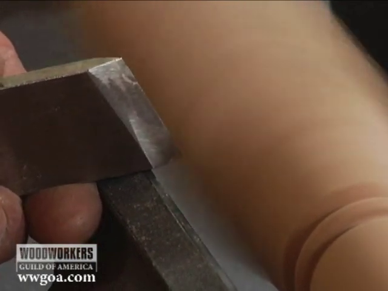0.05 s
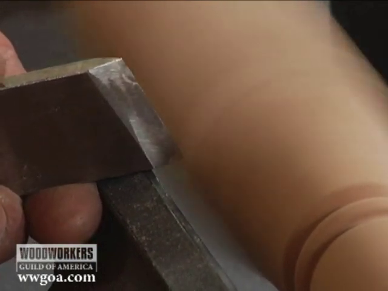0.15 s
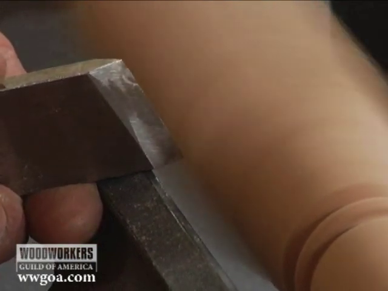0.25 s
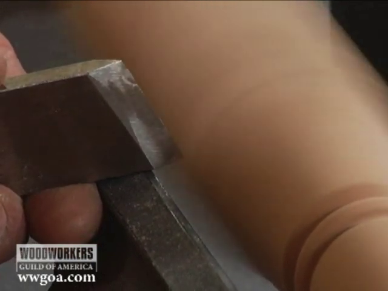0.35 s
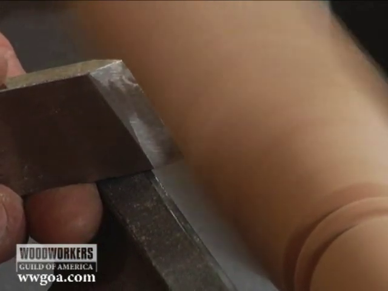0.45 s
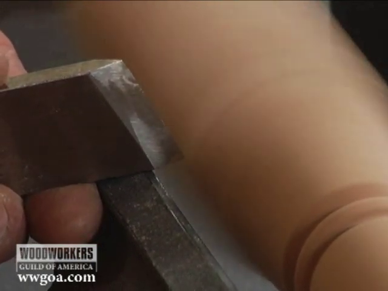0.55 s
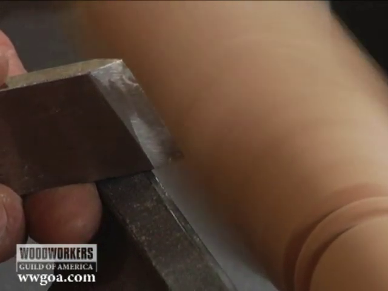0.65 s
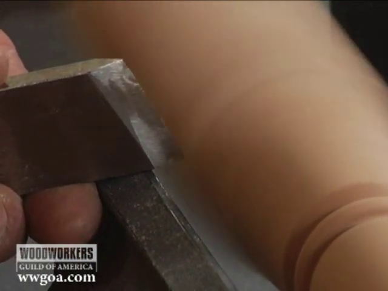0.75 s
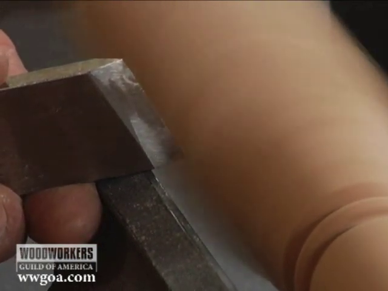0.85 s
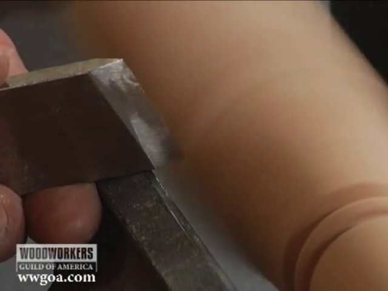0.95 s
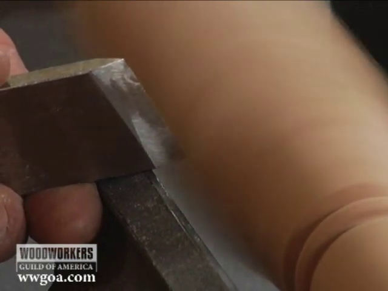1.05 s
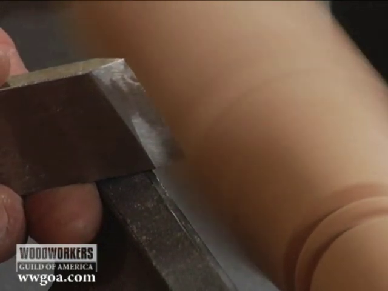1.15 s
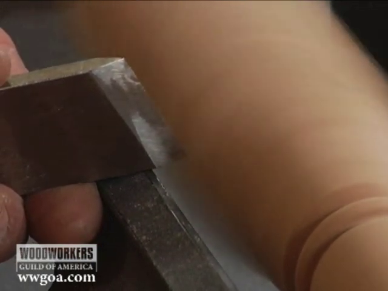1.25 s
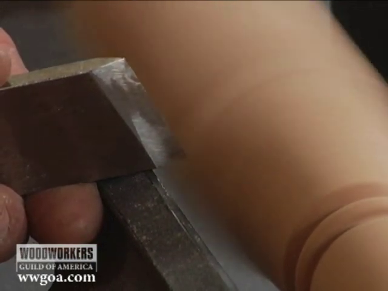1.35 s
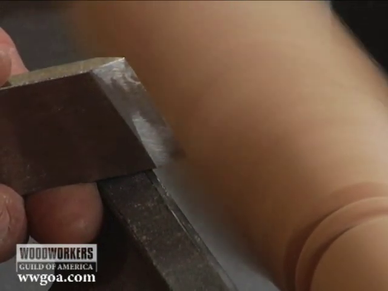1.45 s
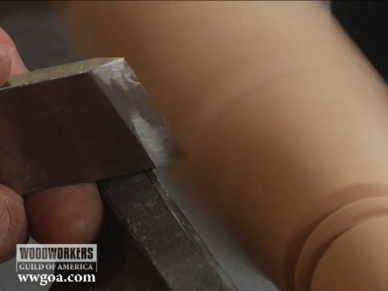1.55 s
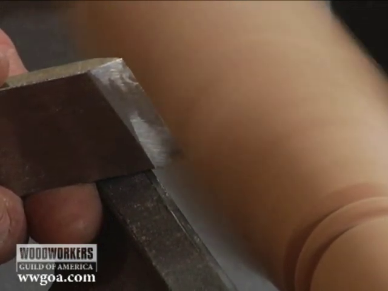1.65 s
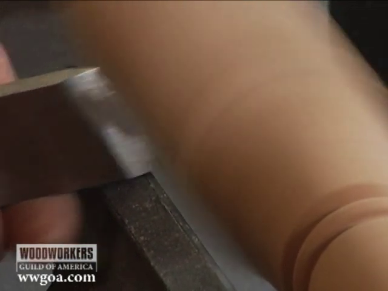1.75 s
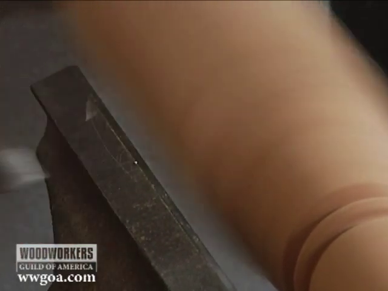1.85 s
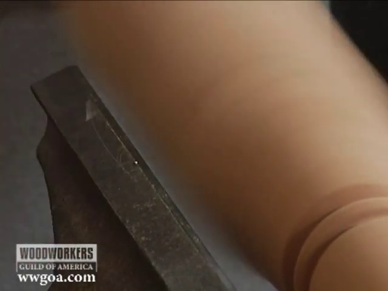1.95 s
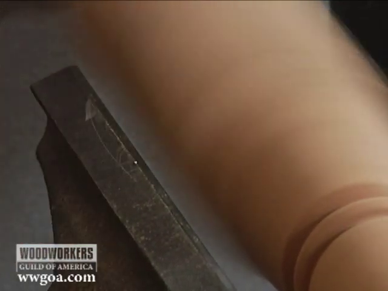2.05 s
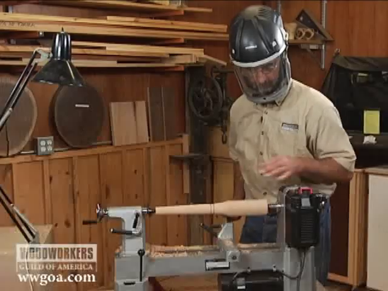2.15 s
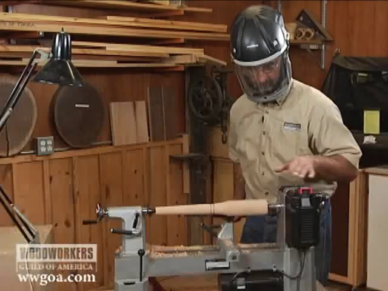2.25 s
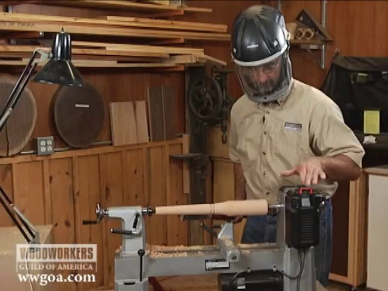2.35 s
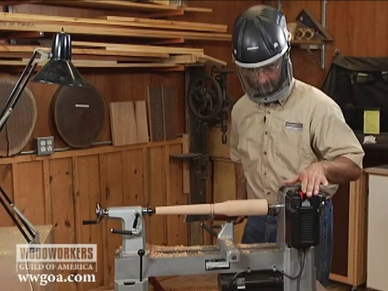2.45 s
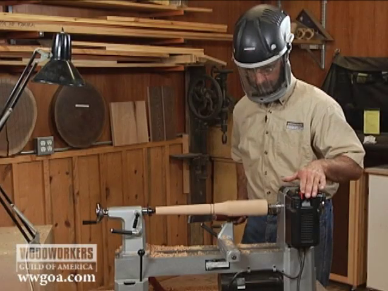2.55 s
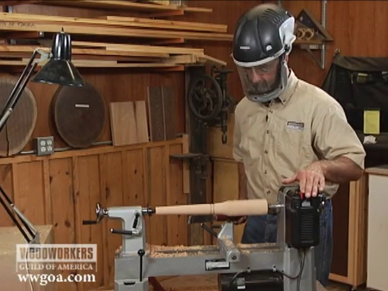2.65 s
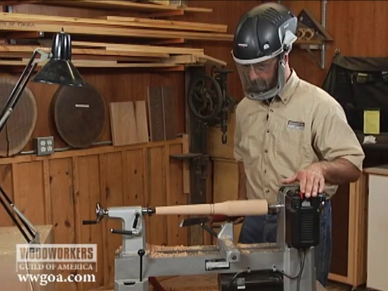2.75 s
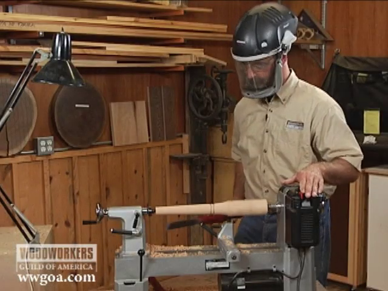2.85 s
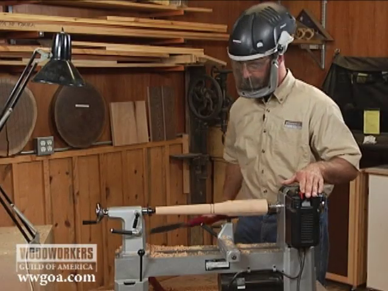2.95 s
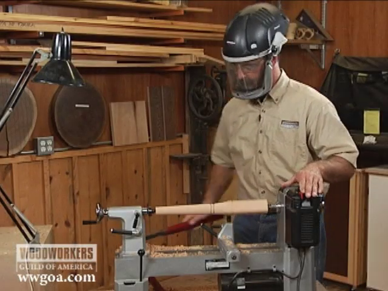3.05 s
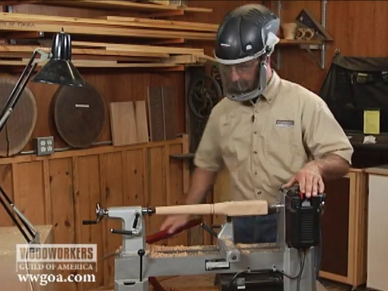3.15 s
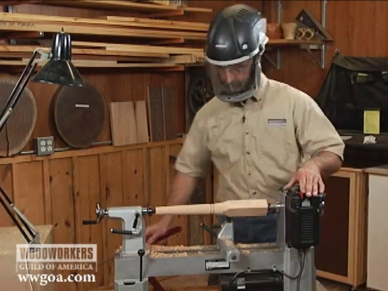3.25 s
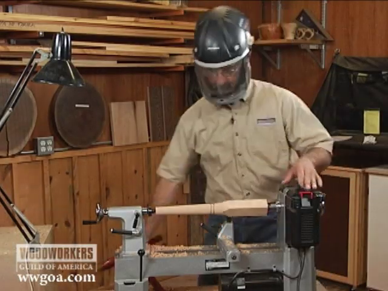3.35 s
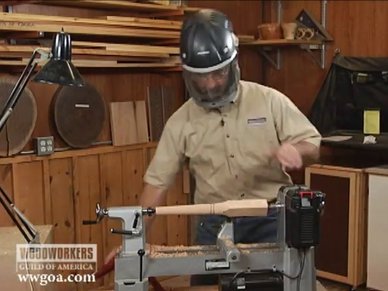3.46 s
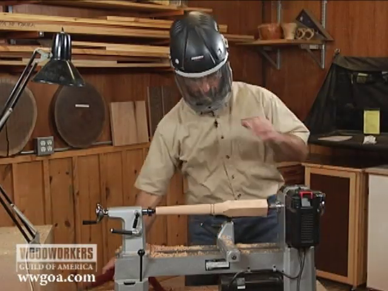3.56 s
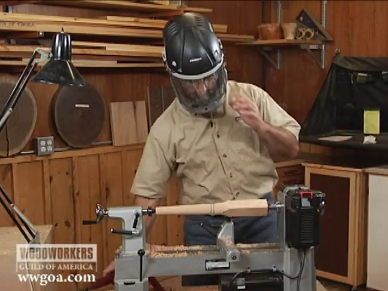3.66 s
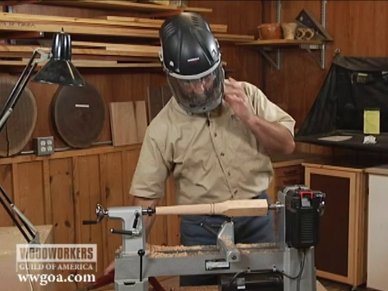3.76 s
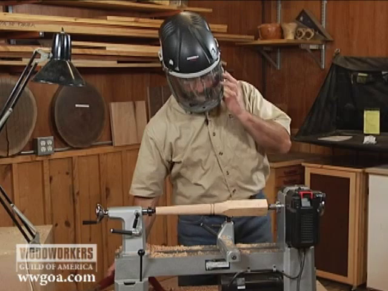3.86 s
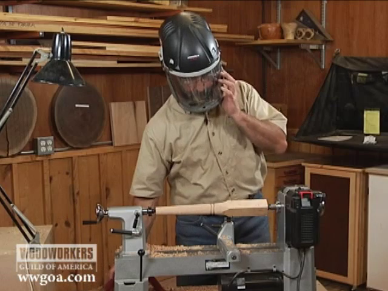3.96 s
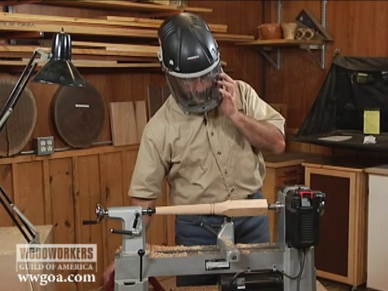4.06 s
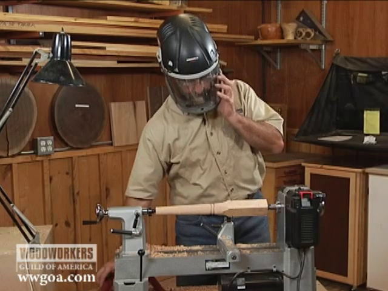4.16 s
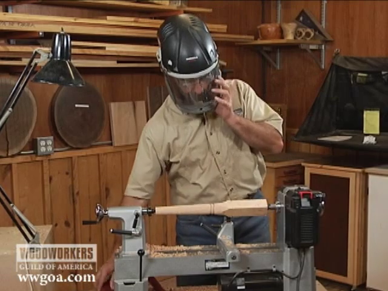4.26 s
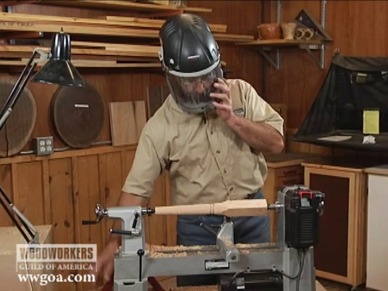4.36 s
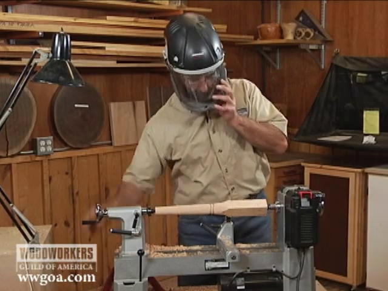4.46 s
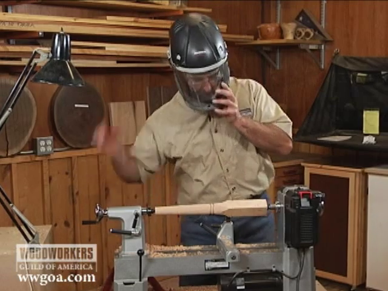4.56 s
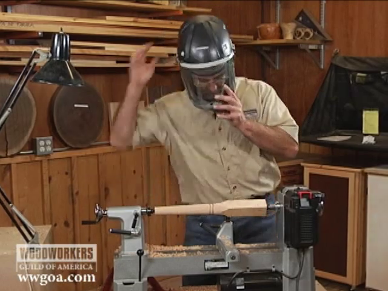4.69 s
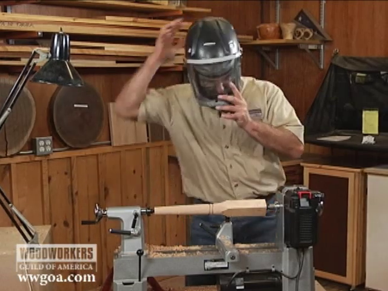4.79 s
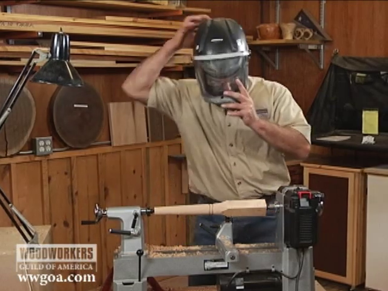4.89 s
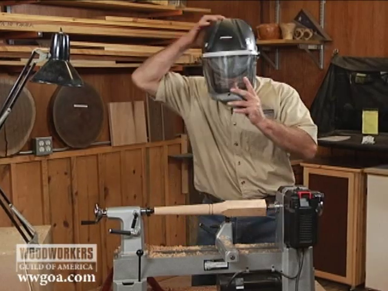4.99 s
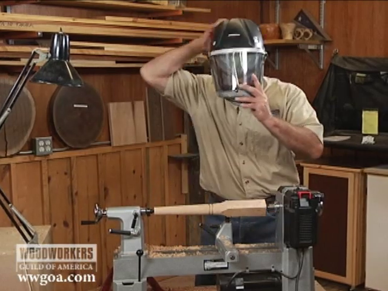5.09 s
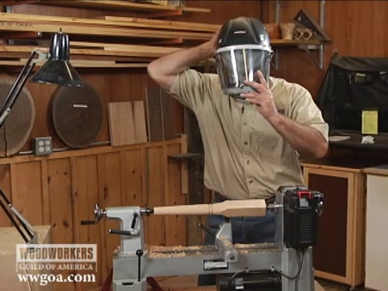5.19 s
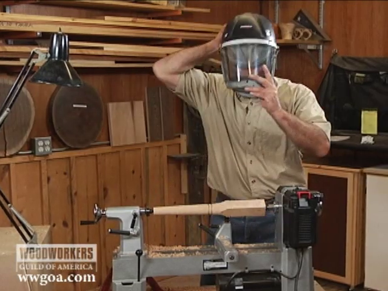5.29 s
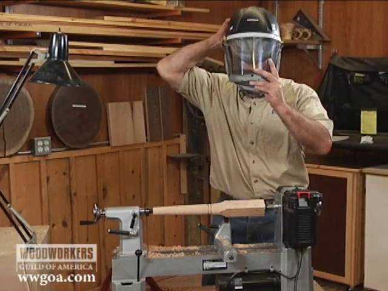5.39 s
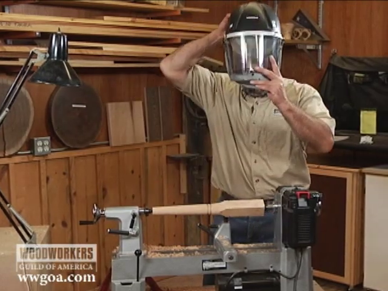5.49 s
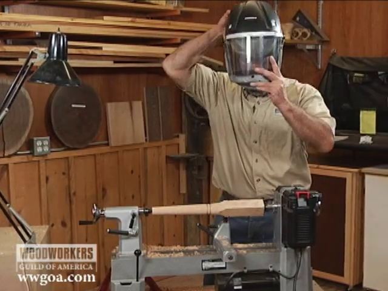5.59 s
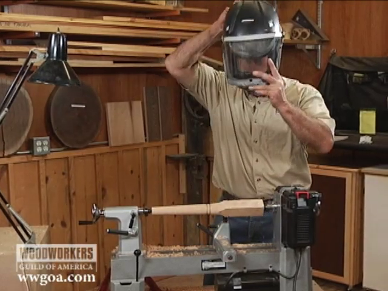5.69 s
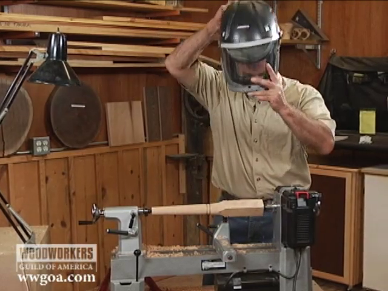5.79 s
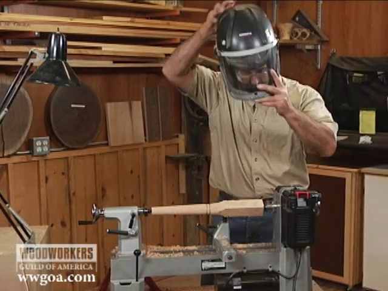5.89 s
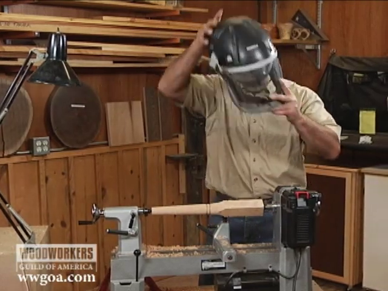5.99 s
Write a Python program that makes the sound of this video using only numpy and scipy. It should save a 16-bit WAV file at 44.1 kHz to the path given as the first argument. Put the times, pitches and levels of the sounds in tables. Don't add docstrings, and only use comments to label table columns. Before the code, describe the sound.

A chisel buzzes and rattles loudly on spinning wood, lifts off, then only a helmet blower's airy hum remains with knocks and rustling cloth.

```python
import sys
import numpy as np
from scipy import signal
from scipy.fft import rfft, irfft, next_fast_len
from scipy.io import wavfile
from scipy.ndimage import uniform_filter1d, map_coordinates

SR = 44100
rng = np.random.default_rng(int(sys.argv[2]) if len(sys.argv) > 2 else 0)


def to_wav(sig):
    pcm = np.clip(np.atleast_2d(sig), -1, 1) * 32767
    pcm = np.round(pcm).astype(np.int16)
    wavfile.write(sys.argv[1], SR, pcm.T)


def invert_db(x):
    u = np.asarray(x, float) / 20
    return 10 ** u


N = 265923
TIME = np.arange(N) / SR
LIFT_OFF_S = 1.7


def unit(x):
    return x / np.sqrt(np.mean(x ** 2) + 1e-20)


def along(points, hz):
    f, v = np.transpose(points)
    return np.interp(np.log(hz + 1), np.log(f + 1), v)


def curves(rows):
    s, *cols = np.transpose(rows)
    return [np.interp(TIME, s, c) for c in cols]


def swells(rows):
    bells = []
    for s, rise, fall, db, *_ in rows:
        bells.append(invert_db(db) * np.exp(-((TIME - s) / np.where(TIME < s, rise, fall)) ** 2))
    return np.array(bells)


def wobble(rate):
    return map_coordinates(rng.standard_normal(int(N * rate / SR) + 4), [TIME * rate])


def filtered(x, response):
    m = next_fast_len(len(x) + 8192)
    return irfft(rfft(x, m) * response(np.fft.rfftfreq(m, 1 / SR)), m)[:len(x)]


def resonant(modes, hz):
    total = 0
    for k, (c, w, db) in enumerate(modes):
        total = total + (-1) ** k * invert_db(db) * 1j * hz * w / (c * c - hz * hz + 1j * hz * w)
    return total


def lifted(modes, hz):
    return invert_db(sum(db / (1 + (2 * (hz - c) / w) ** 2) for c, w, db in modes))


def patchy(depth_db):
    z = signal.stft(rng.standard_normal(N + 512), nperseg=512)[2]
    field = uniform_filter1d(rng.standard_normal(z.shape), size=5, axis=0)
    field = uniform_filter1d(field, size=10, axis=1)
    return signal.istft(z * invert_db(depth_db * unit(field)), nperseg=512)[1][:N]


def shop(x):
    # f/Hz, t60/s
    room_decay = [(100, .5), (300, .13), (780, .3), (1200, .12), (10000, .22)]
    hz, t, z = signal.stft(rng.standard_normal(SR // 2), SR, nperseg=256)
    tail = signal.istft(z * invert_db(-60 * t / along(room_decay, hz)[:, None]), SR, nperseg=256)[1]
    return signal.fftconvolve(np.pad(x, (300, 0)), tail / np.linalg.norm(tail))[:N]


def blower():
    # t/s, raised 0-1
    raising = [(0, 0), (4.55, 0.01), (4.85, 0.84), (5.05, 0.67), (5.3, 0.8), (5.6, 0.83), (6.1, 0.8)]
    # t/s, speed 0-1
    run_down = [(0, 1), (5.86, 1), (5.93, 0.98), (6.03, 0.91)]
    # f/Hz, level/dB per Hz
    sealed_colour = [(180, -49), (300, -13.5), (544, -5.5), (581, -10.5), (709, 2.5), (1160, -6),
                     (2110, -6), (2570, -13.5), (3080, -27), (3460, -17.5), (3890, -33), (4220, -18.5),
                     (5060, -25.5), (6280, -23), (15600, -30)]
    # f/Hz, level/dB per Hz
    raised_colour = [(180, -50), (300, -17), (397, -3.5), (509, -6), (601, -19), (795, -9), (1140, -16),
                     (1440, -6), (2140, -16.5), (2450, -16), (4510, -23), (13200, -29), (15600, -33)]
    # f/Hz, width/Hz, lift/dB
    duct = [(470, 16, 4.5), (1530, 420, 5.5), (2220, 85, 4), (2480, 340, 7), (3550, 94, 7),
            (4110, 230, 10.5), (5690, 230, 6.5), (6230, 110, 5), (6780, 280, 8), (7420, 220, 8),
            (9500, 300, 1), (10660, 620, 4.5)]
    # f/Hz, width/Hz, lift/dB
    mouth = [(410, 91, -2.5), (1300, 170, 3), (1650, 78, 6.5), (2820, 290, -9.5), (3460, 60, 4),
             (3810, 180, -15), (4100, 290, 5), (4460, 140, 6.5)]
    # f/Hz, rms level/dB, change when raised/dB
    rotor = [(101.4, -66.5, -6.5), (207, -62.5, 7.5), (415, -66.5, -17), (2066, -56.5, -5.5)]
    # f/Hz, level/dB per Hz
    rumble_colour = [(15, -69), (45, -12), (97, -6), (136, -5), (199, -8), (240, -2.5), (270, -6),
                     (400, -1), (520, -22), (880, -120)]
    # peak t/s, rise/s, fall/s, level/dB
    pushes = [
        (4.27, 0.3, 0.16, -60.5),
        (4.68, 0.085, 0.34, -52),
    ]
    # peak t/s, rise/s, fall/s, level/dB
    handling = [
        (2.05, 0.21, 0.13, -81),
        (2.45, 0.17, 0.13, -73.5),
        (3.6, 0.1, 0.13, -69),
        (4.28, 0.046, 0.049, -61),
        (4.6, 0.14, 0.13, -70),
        (5.22, 0.1, 0.076, -67),
    ]
    (lift,), (speed,) = curves(raising), curves(run_down)
    flow = invert_db(-45.5 - 5 * lift - 72 * (1 - speed)) + swells(pushes).sum(axis=0)
    shaking = invert_db(-69) + swells(handling).sum(axis=0)
    sealed = unit(filtered(patchy(0.35), lambda hz: invert_db(along(sealed_colour, hz)) * lifted(duct, hz)))
    raised = unit(filtered(patchy(1.6), lambda hz: invert_db(along(raised_colour, hz)) * lifted(mouth, hz)))
    air = invert_db(2.5) * (np.cos(lift * np.pi / 2) * sealed + np.sin(lift * np.pi / 2) * raised)
    for hz, db, change_db in rotor:
        level = invert_db(db + 47 + change_db * lift + 3.0 * wobble(25))
        air = air + level * np.sin(2 * np.pi * hz * TIME + 1.34 * wobble(14))
    air = map_coordinates(air, [np.cumsum(speed) - 1], mode="nearest")
    flutter_db = .5 * wobble(8) + .5 * wobble(20)
    rumble = filtered(patchy(1.0), lambda hz: invert_db(along(rumble_colour, hz)))
    rumble = unit(invert_db(0.57 * wobble(10.0)) * rumble)
    hz, t, z = signal.stft(air, SR, nperseg=512)
    slide = np.interp(t, TIME, 1.65 * wobble(1.27))
    depth_db = 2.4 * np.clip(hz[:, None] / 5000 - .6, 0, 1)
    z = z * invert_db(depth_db * np.cos(hz[:, None] / 480 + slide))
    air = signal.istft(z, SR, nperseg=512)[1][:N]
    return flow * invert_db(flutter_db) * air + invert_db(9.0) * shaking * rumble


def seal():
    # peak t/s, rise/s, fall/s, level/dB, centre f/Hz, half width/Hz
    puffs = [
        (4.38, 0.38, 0.24, -56, 5830, 380),
        (4.66, 0.13, .14, -55, 6940, 450),
        (4.72, .15, 0.17, -57.5, 5800, 500),
        (4.58, .1, .08, -58, 11000, 400),
        (4.68, 0.13, .1, -59, 4700, 230),
        (5.0, .15, .06, -58.5, 7300, 480),
        (4.95, .15, .1, -63, 6200, 450),
        (5.25, .2, 0.13, -59, 6900, 600),
        (5.82, 0.23, 0.081, -54.5, 6200, 820),
        (6.0, 0.0074, .01, -55, 6660, 1000),
    ]
    hz, t, z = signal.stft(patchy(2.1), SR, nperseg=512)
    gains = 0
    for swell, (*_, centre, half_width) in zip(swells(puffs), puffs):
        bump = 1 / (1 + ((hz[:, None] - centre) / half_width) ** 2)
        gains = gains + np.interp(t, TIME, swell) * np.sqrt(SR / np.pi / half_width) * bump
    return signal.istft(z * gains, SR, nperseg=512)[1][:N]


def cloth():
    # peak t/s, rise/s, fall/s, level/dB, fine weave/dB
    rubs = [
        (3.755, .006, 0.077, -55, 0),
        (4.11, 0.19, 0.11, -60, -10),
        (4.29, 0.077, 0.072, -53.5, 3),
        (4.6, 0.21, 0.15, -51, -6),
        (5.0, 0.59, 0.11, -53.5, -17),
        (5.23, 0.1, 0.14, -56.5, -12),
        (5.61, 0.18, .06, -61, -10),
        (5.84, .04, .03, -71, -2),
        (6.0, 0.02, 0.042, -61.5, 8),
    ]
    # f/Hz, level/dB per Hz
    coarse_weave = [(2500, -31), (4000, -12), (4700, 1), (6700, -4), (8100, -1.5), (10600, 1.5),
                    (13000, -14), (15700, -26)]
    # f/Hz, level/dB per Hz
    fine_weave = [(7000, -47), (11000, -10), (13000, -3), (15700, -5)]
    strokes = swells(rubs)
    grains = patchy(2.5) * invert_db(0.83 * wobble(500) + 0.69 * wobble(30))
    coarse = unit(filtered(grains, lambda hz: invert_db(along(coarse_weave, hz))))
    fine = unit(filtered(grains, lambda hz: invert_db(along(fine_weave, hz))))
    fine_share = invert_db([row[-1] for row in rubs]) @ strokes
    return invert_db(-0.8) * (strokes.sum(axis=0) * coarse + fine_share * fine)


def knocks():
    # t/s, peak level/dB, f/Hz, t60/s, thump/dB
    blows = [(2.436, -34, 1000, 0.037, -62), (2.433, -40, 383, .04, -62), (2.444, -37.5, 500, 0.065, -62),
             (2.458, -44, 486, .06, -64), (2.446, -41, 1010, 0.033, -62), (3.193, -48.5, 192, 0.058, -51),
             (3.474, -20, 405, 0.039, -31), (3.4746, -34, 232, 0.072, -50), (3.4685, -38, 990, .03, -62),
             (3.486, -35, 336, 0.049, -50), (3.503, -38, 375, .05, -42), (3.514, -36, 176, 0.05, -46),
             (3.524, -42, 440, 0.081, -60), (3.54, -42, 205, .08, -54), (3.959, -29, 655, 0.045, -44),
             (3.959, -35, 398, 0.074, -60), (4.25, -46, 345, 0.06, -34), (4.29, -51, 330, 0.05, -38),
             (4.275, -41, 766, .04, -62), (4.399, -39, 211, 0.034, -54), (4.487, -32, 262, 0.016, -58),
             (4.575, -56, 380, 0.029, -38), (4.681, -39.5, 410, 0.039, -36), (4.83, -48, 470, 0.15, -62),
             (4.93, -43, 405, 0.064, -60), (4.999, -44, 207, 0.06, -57), (5.216, -37, 442, 0.043, -39),
             (5.56, -40, 410, 0.067, -49), (5.66, -40, 447, 0.031, -62), (5.72, -45, 483, 0.044, -64),
             (5.835, -36, 410, 0.038, -56), (5.991, -37, 503.4, 0.025, -48), (5.998, -31, 483, 0.025, -46)]
    # t/s, peak level/dB, body/dB, t60/s
    ticks = [(2.4305, -45, 6, 0.02), (2.4346, -53, 29, 0.002), (2.438, -63.5, 27.5, 0.028),
             (3.1044, -31, -20, .0025), (3.4645, -44, -1, 0.053), (3.79, -48, 1, 0.0092),
             (3.9595, -52, 14, .006), (4.3444, -36.5, 4.5, 0.0057), (4.681, -41, 4, 0.011),
             (5.309, -42, 4, 0.0058), (5.559, -42, -2, .012), (5.6085, -39, 2, 0.0088),
             (5.8341, -46, 10, 0.018), (5.9958, -45, -11, .02)]
    # (f/Hz, width/Hz, level/dB)
    set_down = (3.4675, -25, 0.014, [(4800, 200, 0), (7900, 200, -2), (8600, 270, -2), (11600, 300, -4),
                (12800, 120, 2)])
    out, t = np.zeros(N + SR), TIME[:SR // 4]
    for s, db, hz, t60, thump_db in blows:
        ring = np.sin(2 * np.pi * hz * t)
        ring = ring + 0.16 * np.sin(2 * np.pi * hz * 0.84 * t) + 0.39 * np.sin(2 * np.pi * hz * 0.57 * t)
        thump = invert_db(thump_db - 60 * t / 0.061) * np.sin(2 * np.pi * 85 * t) * (1 - np.exp(-t / 0.012))
        envelope = invert_db(db + 4.5 - 60 * t / t60) * (1 - np.exp(-t / 0.0021))
        out[round(s * SR):][:len(t)] += envelope * ring + thump
    for s, db, body_db, t60 in ticks:
        envelope = invert_db(db - 60 * t / t60) * (1 - np.exp(-t / 0.0002))
        burst = rng.standard_normal((2, len(t))) * envelope
        crack = filtered(burst[0], lambda hz: resonant([(11000, 11000, -1.7)], hz))
        body = filtered(burst[1], lambda hz: resonant([(1560, 1360, body_db + 11.5)], hz))
        out[round(s * SR):][:len(t)] += crack + body
    s, db, t60, modes = set_down
    contact = rng.standard_normal(len(t)) * invert_db(db - 60 * t / t60)
    out[round(s * SR):][:len(t)] += filtered(contact, lambda hz: resonant(modes, hz))
    return out[:N]


def strikes(turn, column, rise, fall, between_db):
    # place on the turn 0-1, chatter/dB, shaving/dB
    corners = [(.985, 5.5, .5), (.243, -5, 0), (.495, 2, -.5), (.745, 0, .5)]
    force = invert_db(between_db)
    for corner in corners:
        since = (turn - corner[0]) % 1
        force = force + invert_db(corner[column]) * (1 - np.exp(-since / rise)) * np.exp(-since / fall)
    return force


def surface(turn, memory):
    grain = rng.standard_normal((64, 1770))
    grain = signal.lfilter([1], [1, -np.clip(memory, 0, .97)], grain, axis=0)
    return unit(grain[(16 + turn.astype(int)) % 64, (turn % 1 * 1770).astype(int)])


def shaft_orders(turn):
    answer = [(3.5, .6), (5, .36), (7, .68), (8.5, .28), (9.5, .35), (10.5, -.12), (12.5, .03), (13.5, .36),
              (14.5, .16), (15.5, .68), (17, 1.12), (20.5, .85), (26, 1.05), (29, 1.3), (33, 1.55)]
    # level/dB, change as the edge travels/dB per s
    flexing = [(-31, 2), (-17, -2), (-22, 3), (-37, 5), (-29, 0), (-19, 2), (-15, 2), (-23, 0), (-15, 1),
               (0, 1), (-10, 0), (-12, 2), (-14, 4), (-12, 0), (-23, 0), (-30, 0), (-19, 2), (-16, -6),
               (-19, 3), (-18, 10), (-15, -4), (-20, -10), (-17, 6), (-23, -4), (-16, -3), (-19, -1),
               (-19, 3), (-21, 2), (-14, -3), (-12, -4), (-18, 3), (-8, -1)]
    lag = np.cumsum(np.interp(np.arange(40) - .5, *np.transpose(answer)))
    blank = 0
    for order, (db, travel_db) in enumerate(flexing, start=3):
        wander = (order / 28) ** 2
        phase = 2 * np.pi * (order * turn + .35 - lag[order] + lag[12])
        phase = phase + .5 * wander ** 2 * rng.standard_normal() + (.1 + .65 * wander) * wobble(4)
        drift_db = travel_db * (np.minimum(TIME, LIFT_OFF_S) - .8)
        drift_db = drift_db + (1.1 + .5 * wander) * (wobble(5) + wobble(16))
        drift_db = drift_db + 1.8 * wander * np.cos(np.pi * turn)
        high_db = -3 * (order > 15)
        blank = blank + invert_db(db + drift_db + high_db) * np.cos(phase)
    idle = sum(np.cos(2 * np.pi * (k * turn + .35 - lag[k] + lag[12])) for k in (4, 8))
    return blank, idle


def slaps(turn):
    # place on the turn 0-1, level/dB, strongest t/s, lasting/s, edge/dB
    bounces = [
        (.033, 0, .65, .75, -6),
        (.1, -8, .6, .4, -2),
        (.247, -12, .7, .8, 6),
        (.385, -4, .35, .45, -10),
        (.47, -5, 1.45, .25, -6),
        (.593, -1, .95, .9, -4),
        (.74, -6, .9, .8, 5),
        (.84, -11, .6, .7, 3),
        (.935, -1, .58, .18, -6),
        (.945, -6, 1.35, .4, -3),
    ]
    # f/Hz, width/Hz, level/dB
    slap_body = [(782, 340, 0), (1300, 350, -13)]
    # f/Hz, width/Hz, level/dB
    slap_edge = [(2100, 1360, 0)]
    dull, edge, contact = 0, 0, .25
    for place, db, s, lasting, edge_db in bounces:
        off = (turn - place + .003 * wobble(9) + .5) % 1 - .5
        size = invert_db(db + 1.5 * wobble(20)) * np.exp(-((TIME - s) / lasting) ** 2) * (TIME < LIFT_OFF_S)
        dull = dull - size * np.exp(-(off / .005) ** 2)
        edge = edge - invert_db(edge_db) * size * np.exp(-(off / .001) ** 2)
        contact = contact + size * np.exp(-((off - .015) / .03) ** 2)
    body = unit(filtered(dull, lambda hz: resonant(slap_body, hz) * hz / (hz + 400)))
    sharp = unit(filtered(edge, lambda hz: resonant(slap_edge, hz) ** 2))
    sound = np.sqrt(LIFT_OFF_S * SR / N) * (body + invert_db(-8.5) * sharp)
    return sound, np.gradient(edge), contact


def chisel(turn, edges):
    # f/Hz, width/Hz, level/dB, change as the edge travels/dB per s
    steel = [(1677, 27, 6, 4), (1890, 42, 12, -5.5), (2538, 88, 9.5, -6), (3470, 140, -2, 5.5),
             (4550, 148, 6.5, -3), (4940, 76, 0.5, 2), (5550, 54, -3, 7), (5870, 71, -1, 1),
             (6740, 100, 3.5, 0), (7830, 120, 4, -1.5), (8440, 220, 3.5, 0.5), (11100, 230, -0.5, -0.5),
             (12900, 190, -0.5, 1), (14000, 230, -15, -5), (15200, 250, -12, 6)]
    grip_first = [(0, -2, 0, 3), (-1, -6, -1, 3), (-4, -3, -5, 5), (0, -4, -4, 4), (1, -6, 5, 2),
                  (0, -3, 5, 0), (0, -3, 3, -1), (0, -2, 3, -2), (0, -1, 0, 1), (4, 0, -2, 0),
                  (0, 0, -1, 1), (-4, 1, 1, 2), (-3, -3, 2, 3), (0, 0, 0, 2), (-3, -3, 5, 0)]
    grip_last = [(0, 3, 0, 0), (2, 0, -2, 0), (-7, -5, -5, 6), (3, -1, -1, 1), (3, 2, -3, 2), (-4, 0, 0, 4),
                 (-1, 1, -1, 2), (-1, 0, -1, 2), (-1, 1, -3, 2), (-3, 5, -2, 0), (0, 1, -3, 1),
                 (-2, 1, 0, 0), (-2, 1, -1, 2), (-2, -1, 1, 1), (-6, -2, 7, -3)]
    bites = np.gradient(strikes(turn - .005, column=2, rise=0.0014, fall=0.04, between_db=-40))
    splinters = .5 * rng.standard_normal(N) + surface(turn, memory=.9)
    splinters = splinters * strikes(turn - .012, column=2, rise=.02, fall=.035, between_db=-22)
    travel = np.minimum(TIME, 2) - .8
    side = (4 * turn + .15).astype(int) % 4
    ring = 0
    for (hz, width, db, change_db), first, last in zip(steel, np.array(grip_first), np.array(grip_last)):
        grip_db = first[side] + (last - first)[side] * np.clip((TIME - .3) / 1.1, 0, 1)
        sway_db = .4 * wobble(4) + wobble(60)
        clicks = .8 * unit(bites) + .12 * unit(edges)
        blows = min(1.3, 4000 / hz) * clicks + unit(splinters)
        strength = invert_db(grip_db + change_db * travel + sway_db)
        ring = ring + filtered(strength * blows, lambda f: resonant([(hz, width, db)], f))
    return unit(ring * (TIME < 2))


def lathe():
    # t/s, turns per s
    shaft = [(0, 25.09), (.3, 25.07), (.45, 24.92), (.6, 24.78), (.78, 24.9), (.9, 24.94), (6.1, 24.94)]
    # t/s, level/dB
    pressure = [(0, 1.5), (.2, 1.5), (.4, 2), (.6, 2), (.88, -2), (1.15, -1), (1.57, -1), (1.69, -10)]
    # t/s, level/dB
    rubbing = [(0, -12.5), (.4, -11), (.6, -4), (.9, -6), (1.3, -3.5), (1.7, -1)]
    # level/dB, share of pressure, change as the edge travels/dB per s, fade after lift-off/dB per s
    layers = [
        (-25, 0.54, 0.43, 322),
        (-26.5, 0.2, -3, 115),
        (-41, 0.51, 2.5, 385),
    ]
    # f/Hz, level/dB per Hz
    chatter_colour = [(50, -23), (240, -9), (400, -1), (443, -3), (485, -4.5), (821, -4), (1070, -5.5),
                      (1900, -9.5), (2350, -19), (2580, -11), (3870, -28.5), (4500, -42), (5850, -20.5),
                      (9900, -120)]
    # f/Hz, width/Hz, lift/dB
    rest = [(950, 110, -2.5), (1194, 11, 6), (1380, 110, 2), (1800, 79, 5.5), (1927, 145, 4),
            (2460, 94, -3), (3505, 93, 13.5)]
    # f/Hz, level/dB per Hz
    shaving_colour = [(60, -48), (1470, 0), (2500, -3), (3900, -5.5), (4470, -6.5), (7250, -7),
                      (8570, -24.5), (9920, -13), (13000, -22), (15600, -35)]
    # peak t/s, rise/s, fall/s, level/dB
    free_spin = [
        (1.78, 0.089, 0.1, -49.5),
    ]
    (hand_db,), (rub_db,) = curves(pressure), curves(rubbing)
    levels = []
    for db, share, travel_db, fade_db in layers:
        travelled_db = travel_db * np.minimum(TIME, LIFT_OFF_S)
        faded_db = fade_db * np.maximum(TIME - LIFT_OFF_S, 0)
        levels.append(db + share * hand_db + travelled_db - faded_db)
    blank_db, chatter_db, shaving_db = levels
    turn = np.cumsum(curves(shaft)[0]) / SR
    blank, idle = shaft_orders(turn)
    slapping, edges, contact = slaps(turn)
    rough = contact ** .25 * (surface(turn, memory=.9) + .3 * rng.standard_normal(N))
    rough = rough * strikes(turn, column=1, rise=0.018, fall=0.16, between_db=rub_db + 3.0)
    chatter = filtered(rough, lambda hz: invert_db(along(chatter_colour, hz)) * lifted(rest, hz))
    chips = patchy(1) + .35 * surface(turn, memory=.9)
    chips = chips * strikes(turn, column=2, rise=.025, fall=.11, between_db=rub_db - 1.5)
    shaving = unit(filtered(chips, lambda hz: invert_db(along(shaving_colour, hz))))
    shaving = shaving + invert_db(-3.0) * chisel(turn, edges)
    cutting = invert_db(blank_db + 0.4) * unit(blank)
    cutting = cutting + invert_db(chatter_db - 2.5) * unit(chatter)
    cutting = cutting + invert_db(shaving_db + 1.0) * unit(shaving)
    cutting = cutting + invert_db(-34 + 0.11 * hand_db) * slapping
    return cutting + swells(free_spin)[0] * idle


def scene():
    cut, hits = lathe(), knocks()
    echo = shop(invert_db(-18.5) * cut + invert_db(-11) * hits)
    return (blower() + seal() + cloth() + hits + echo + cut)[None]


def top_cut(x):
    return signal.sosfilt(signal.butter(12, 15730, fs=SR, output="sos"), x)


def record(dry):
    # spacing/Hz, width/Hz, depth/dB
    hum_filter = [(600, 16, -10), (300, 14, -5)]

    def notches(hz):
        depth_db = 0
        for step, width, db in hum_filter:
            off = hz - step * np.maximum(np.round(hz / step), 1800 // step)
            depth_db = depth_db + db / (1 + (2 * off / width) ** 2)
        return invert_db(depth_db)

    def band(hz):
        return (1j * hz / (45 + 1j * hz)) ** 2 * (hz < 15760)

    mix = filtered(dry[0], lambda hz: notches(hz) * band(hz))[None]
    return top_cut(mix)


dry = scene()
out = record(dry)
to_wav(out)
```